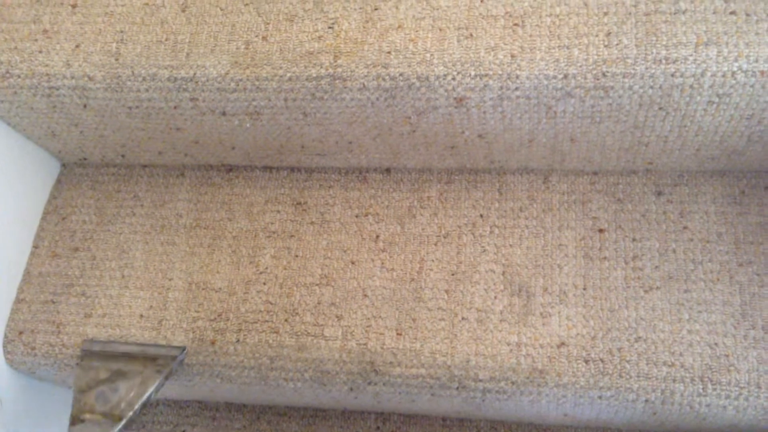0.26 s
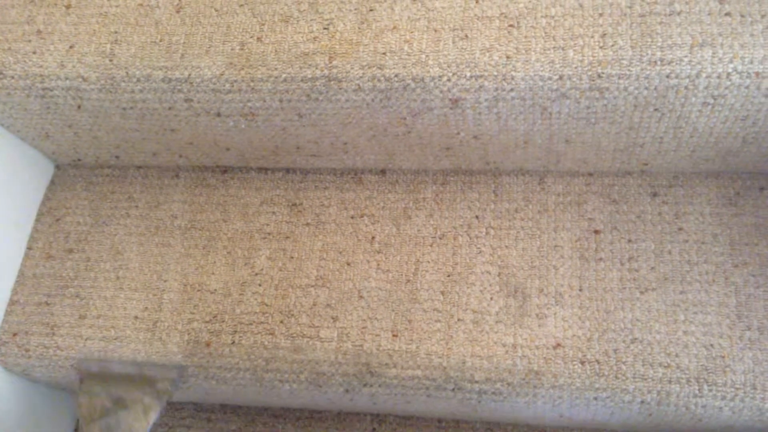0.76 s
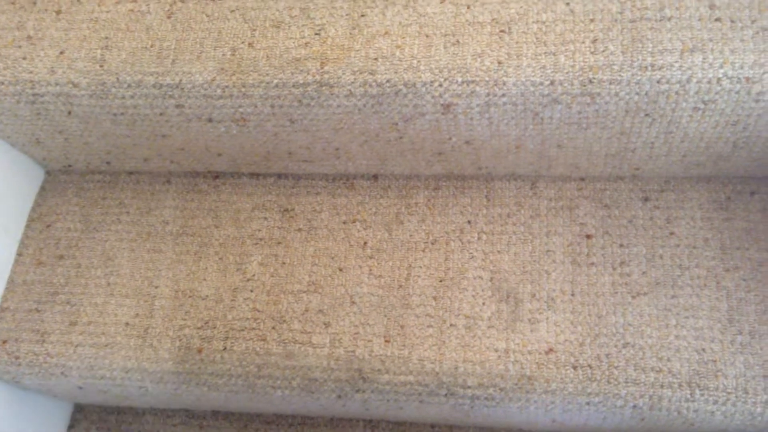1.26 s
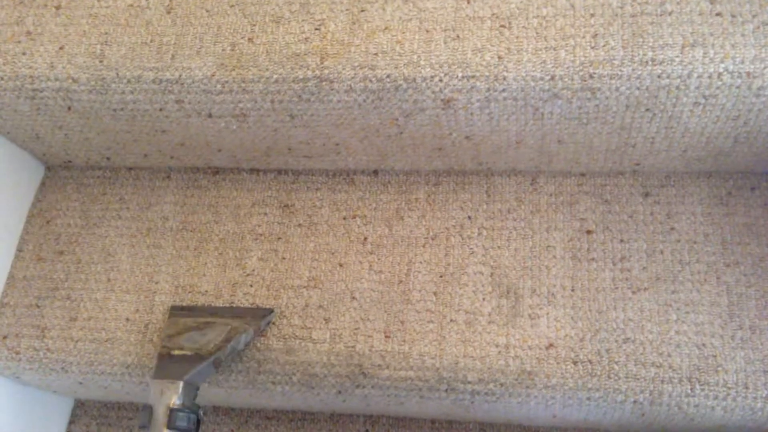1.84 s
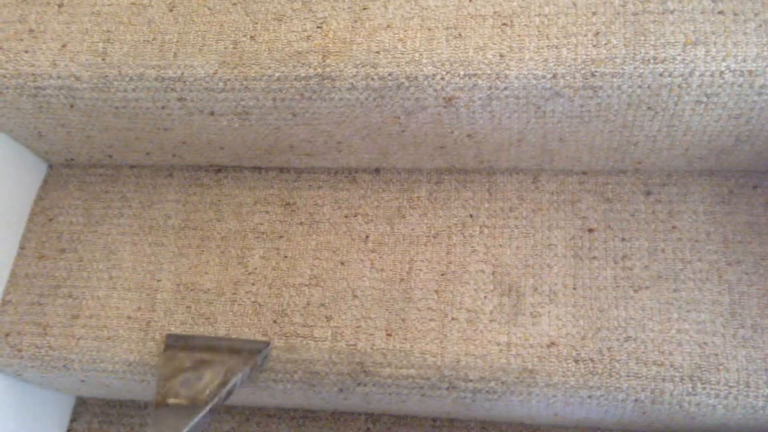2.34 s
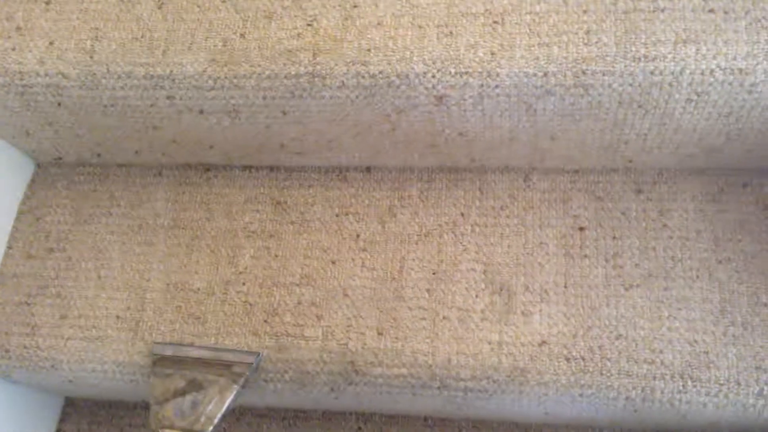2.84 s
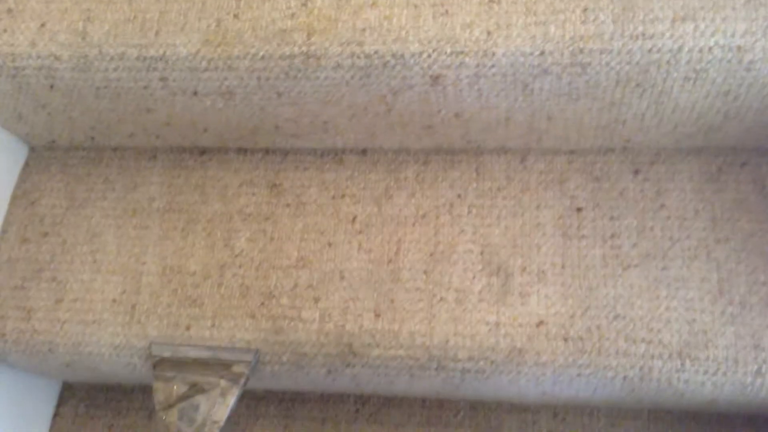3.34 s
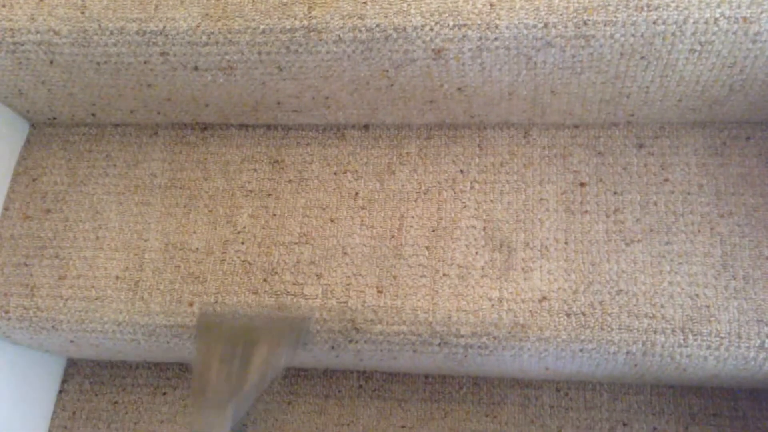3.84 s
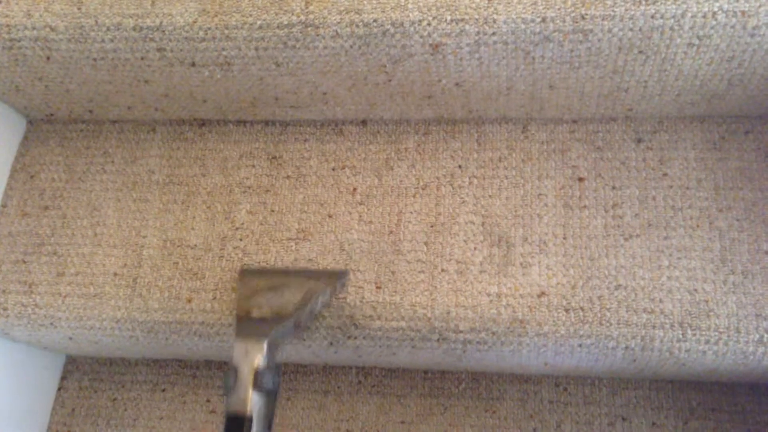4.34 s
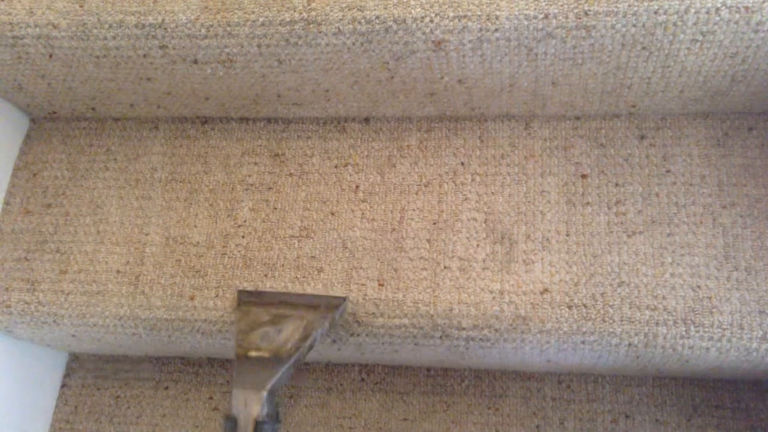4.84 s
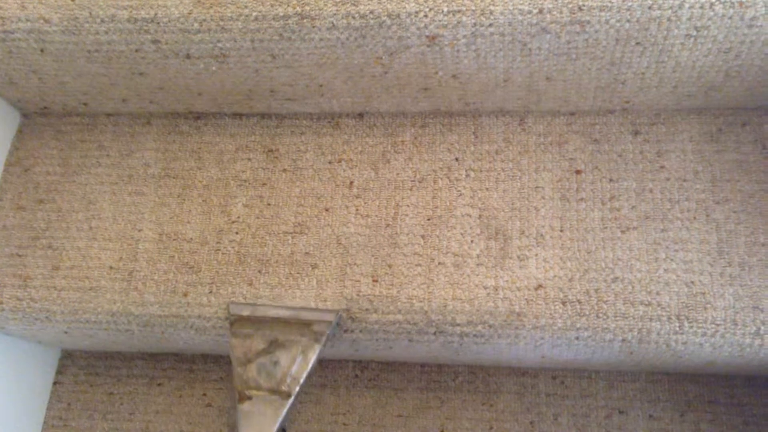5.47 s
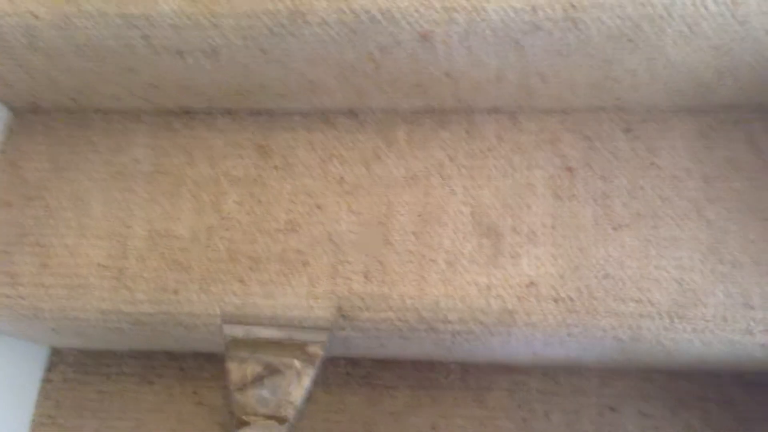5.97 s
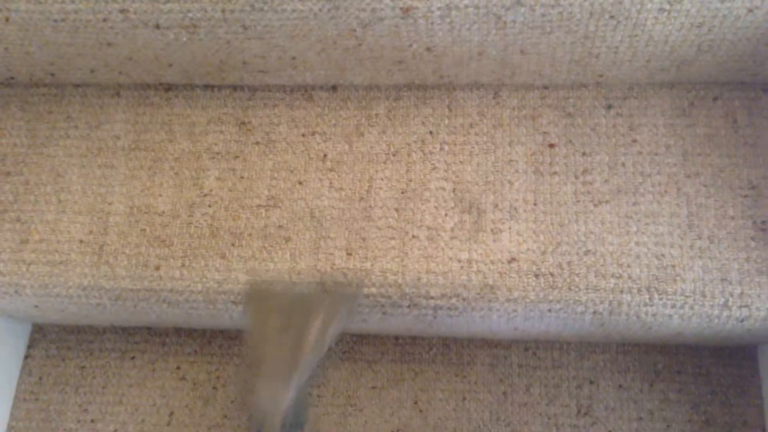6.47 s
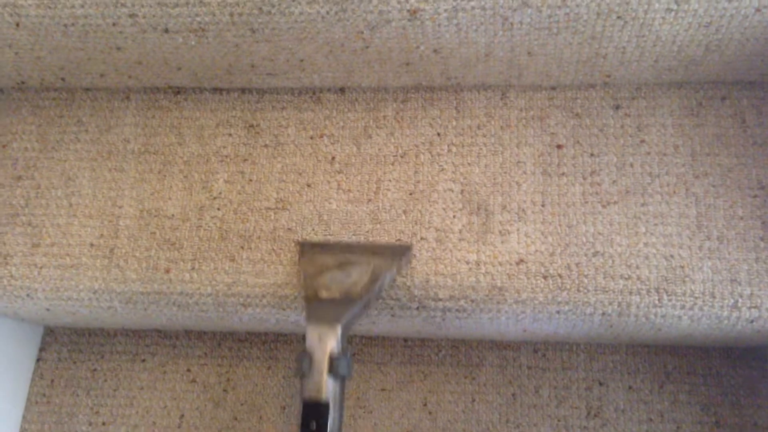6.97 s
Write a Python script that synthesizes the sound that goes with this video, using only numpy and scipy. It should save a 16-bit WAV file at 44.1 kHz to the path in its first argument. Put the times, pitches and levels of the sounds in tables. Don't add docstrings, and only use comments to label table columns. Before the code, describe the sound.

Close to carpeted stairs indoors, a cleaning machine drones with a low, slowly beating pump hum and a fan whine. Its hand tool hisses and sucks along wet pile, slurps loudly at the step's edge, lets go with a gulp and hose flutter, then thuds softly onto the tread for another stroke. Three such cycles pass, and a fourth stroke begins. Close microphone, short hallway tail.

```python
import sys
import numpy as np
from scipy import signal
from scipy.fft import rfft, irfft, next_fast_len
from scipy.io import wavfile
from scipy.ndimage import uniform_filter1d, map_coordinates

SR = 44100
rng = np.random.default_rng(int(sys.argv[2]) if len(sys.argv) > 2 else 0)


def linear_from_db(decibels):
    return 10 ** (np.asarray(decibels, float) / 20)


def inscribe(sig):
    pcm = np.round(np.clip(np.atleast_2d(sig).T, -1, 1) * 32767)
    wavfile.write(sys.argv[1], SR, pcm.astype(np.int16))


N = 318402
FRAME = 1024
TICKS = np.arange(N // 32 + 2) * 32 / SR

# time [s], riser echo delay [ms], slot resonance [Hz].
STROKE = [(0, 1.15, 3450), (.8, 1.06, 3700), (.85, 1.3, 3850), (1.1, 1.27, 3900), (1.75, 1.36, 3600),
          (2.3, 1.24, 4050), (3.0, 1.17, 4180), (3.55, 1.18, 4250), (4.25, 1.4, 2900), (4.75, 1.25, 3200),
          (5.55, 1.19, 3480), (5.68, 1.18, 4200), (6.15, 1.15, 4300), (6.8, 1.42, 2800), (7.22, 1.34, 2980)]
# start [s], time to seal [s], spray hiss [dB],
# slot jet [dB], jet drift [dB per s].
LANDINGS = [
    (-.5, .25, -37, -33, 0),
    (1.61, 0.39, -37.5, -34, -0.5),
    (4.12, 0.23, -37, -33.5, -0.46),
    (6.73, 0.2, -37, -32.5, -.5),
]
# peak [s], slurp [dB], jet [dB], rise [dB per s],
# gap resonance [Hz].
EDGES = [
    (.757, -23.5, -26, 126, 1450),
    (2.94, -32, -34, 226, 1220),
    (3.039, -16, -23, 97, 1198),
    (5.87, -32.5, -37, 58, 1360),
]
# peak [s], slurp [dB], fall [dB per s],
# gap resonance [Hz], upper resonance [dB].
LIFTS = [
    (1.075, -30.5, 120, 1525, 6),
    (3.578, -27.5, 198, 1390, 3),
    (6.17, -28.5, 85, 1320, 10),
]
# peak [s], level [dB].
GASPS = [
    (1.612, -37),
    (4.119, -32.5),
    (4.168, -33.5),
    (6.738, -30.5),
]

GASP_DB_PER_S = 602
EDGE_FALL_DB_PER_S, GULP_RISE_OVER_FALL = 444, 1.2


def unit(x):
    return x / np.sqrt(np.mean(x ** 2) + 1e-20)


def along(points, hz):
    f, v = np.transpose(points)
    return np.interp(np.log(hz + 1), np.log(f + 1), v, left=-120, right=-120)


def curves(rows):
    s, *cols = np.transpose(rows)
    return [np.interp(np.arange(N) / SR, s, c) for c in cols]


def per_sample(control):
    return np.interp(np.arange(N) / SR, TICKS, control)


def wobble(rate):
    knots = rng.standard_normal(int(N * rate / SR) + 4)
    return map_coordinates(knots, [np.arange(N) * rate / SR])


def filtered(x, response):
    m = next_fast_len(N + SR // 2)
    return irfft(rfft(x, m) * response(np.fft.rfftfreq(m, 1 / SR)), m)[:N]


def smoothed_field(shape, bins, frames):
    across = uniform_filter1d(rng.standard_normal(shape), size=bins, axis=0)
    return unit(uniform_filter1d(across, size=frames, axis=1))


def peak(hz, centre_hz, width_hz):
    return 1 / (1 + ((hz - centre_hz) / width_hz) ** 2)


def air(spectrum, patchy_db, lift_db=lambda hz, at: 0):
    overlap = FRAME - FRAME // 4
    hz, s, z = signal.stft(rng.standard_normal(N), SR, nperseg=FRAME, noverlap=overlap)
    at = np.minimum((s * SR).astype(int), N - 1)
    gain_db = patchy_db * smoothed_field(z.shape, 5, 40) + lift_db(hz[:, None], at)
    rough = signal.istft(z * linear_from_db(gain_db), SR, nperseg=FRAME, noverlap=overlap)[1][:N]
    return unit(filtered(rough, lambda f: linear_from_db(along(spectrum, f))))


def swell(s, db, rise, fall):
    s, db, rise, fall = (np.reshape(v, (-1, 1)) for v in (s, db, rise, fall))
    return db - np.where(TICKS < s, rise * (s - TICKS), fall * (TICKS - s))


def summed_db(*rows_db):
    return per_sample(10 * np.log10(np.sum(linear_from_db(2 * np.vstack(rows_db)), axis=0)))


def pump():
    # multiple of the shaft speed, level [dB rms].
    shaft_orders = [(2, -78), (3, -56.5), (4, -41.5), (5, -51.5), (6, -46), (8, -63.5), (17, -60),
                    (23, -66.5), (24, -64), (43, -63.5)]
    shaft_hz, hum_hz, in_step_s = 24.7135, 99.853, .301
    t = np.arange(N) / SR - in_step_s
    out = linear_from_db(-34.5) * np.sin(2 * np.pi * hum_hz * t)
    for order, db in shaft_orders:
        lead = rng.uniform(0, 2 * np.pi) * (order != 4)
        out += linear_from_db(db + 0.74 * wobble(2.65)) * np.sin(2 * np.pi * order * shaft_hz * t + lead)
    return np.sqrt(2) * out


def fan():
    # time [s], shaft speed [Hz].
    speed = [(0, 354), (.42, 361), (.6, 364.7), (.9, 366.3), (1.5, 358), (1.85, 352.3), (2.8, 366),
             (3.5, 365), (3.9, 360.7), (4.38, 352.5), (4.8, 357), (5.15, 364.3), (5.4, 367.2),
             (5.95, 370.3), (6.2, 369), (6.6, 358.7), (6.95, 352.4), (7.22, 354)]
    standing_hz = [350, 356.5, 361, 365.7, 368.2, 372]
    standing_db = [-56.5, -48, -53, -59.5, -46.5, -42]
    # centre [Hz], width [Hz], level [dB rms].
    casing_modes = [(46, 3, -56), (200, 14, -53), (277, 14, -58), (885, 14, -56), (922, 18, -57),
                    (987, 20, -52.5), (1027, 18, -53), (1070, 24, -51)]
    # frequency [Hz], density [dB per Hz].
    roar = [(13, -54), (22, -22), (43, -2.5), (97, 3.5), (162, -11), (200, -41), (311, -14), (365, -10.5),
            (511, -17.5), (1020, -10), (1150, -26), (1500, -8), (1950, -58), (3300, -120)]
    # frequency [Hz], density [dB per Hz].
    drone = [(650, -2), (1100, -29), (1750, 1.5), (2210, 7), (2990, -2), (4450, -1.5), (12600, -21.5),
             (15600, -33)]

    def casing(f):
        return sum(linear_from_db(db) / np.sqrt(w) * 1j * f * w / (c * c - f * f + 1j * f * w)
                   for c, w, db in casing_modes)

    shaft_hz, = curves(speed)
    level_db = np.interp(shaft_hz, standing_hz, standing_db) + 0.57 * wobble(9.6)
    whine = np.sqrt(2) * linear_from_db(level_db) * np.sin(2 * np.pi * np.cumsum(shaft_hz) / SR)
    rush = linear_from_db(-44.5) * air(roar, patchy_db=2.0) + linear_from_db(-41.5) * air(drone, patchy_db=2.0)
    return whine + rush + linear_from_db(41.5) * filtered(rng.standard_normal(N), casing)


def thuds():
    # time [s], blow [dB], contact
    # [ms], puff [dB].
    bumps = [
        (1.6079, -15, 1.73, -36),
        (1.624, -30, 1.5, -38),
        (4.112, -29, 0.82, -35),
        (4.12, -9, 1.52, -31),
        (4.165, -24, 1.6, -40),
        (6.705, -27, .9, -36),
        (6.738, -14.5, 1.64, -26),
        (1.068, -27, 1.4, -50),
        (1.142, -29, 1.6, -50),
        (3.594, -24, 1.5, -40),
    ]
    # frequency [Hz], level [dB], decay by 60 dB [s].
    tread = [(61, -15.5, 0.17), (96, -10.5, 0.092), (135, -9, 0.087), (199, -15, 0.23), (277, -10.5, 0.11),
             (383, -18.5, 0.12), (520, -16.5, 0.058), (640, -19, 0.047), (720, -14, .05)]
    lead_s = .01
    out, t = np.zeros(N + SR), np.arange(SR // 3) / SR
    late = np.maximum(t - lead_s, 0)
    for s, db, contact_ms, puff_db in bumps:
        u = (t - lead_s) * 1000 / contact_ms
        push = (u * u - 1) * np.exp(-u * u / 2)
        ring = sum(linear_from_db(g + 0.66 * rng.standard_normal() - 60 * late / t60) * np.sin(2 * np.pi * hz * late)
                   for hz, g, t60 in tread)
        blow = push + ring * (1 - np.exp(-late / 0.0023))
        puff = np.diff(rng.standard_normal(len(t) + 1)) * np.exp(-((t - .011) / .004) ** 2)
        puff = signal.lfilter([.3], [1, -1.1, .35], puff)
        out[round((s - lead_s) * SR):][:len(t)] += linear_from_db(db) * blow + linear_from_db(puff_db) * puff
    return out[:N]


def seal():
    touch_s, touch_share = 0.032, 0.38
    peel_s, part_s, part_share = 0.053, 0.062, 0.16
    drain_s = 0.55
    press = [(s + d, v) for s, grip_s, *_ in LANDINGS
             for d, v in ((0, 0), (touch_s, touch_share), (grip_s, 1))]
    peel = [(s + d, v) for s, *_ in LIFTS
            for d, v in ((-peel_s, 1), (part_s, part_share), (drain_s, 0))]
    return np.clip(np.interp(TICKS, *np.transpose(sorted(press + peel))), 0, 1)


def stroke_clock():
    land_s = np.transpose(LANDINGS)[0]
    stroke = np.searchsorted(land_s, TICKS, side="right") - 1
    return stroke, TICKS - land_s[stroke]


def flow():
    open_hiss_db, open_jet_db = -53, -53
    wetting_db_per_s, wet_after_s = 2.5, 1.22
    pinch_db, pinch_s = 0.5, 0.3
    edge_hiss_db, gulp_jet_db, gasp_jet_db = -9, -6.5, -2.5
    _, _, hiss_db, jet_db, drift = np.transpose(LANDINGS)
    edge_s, _, surge_db, rise, _ = np.transpose(EDGES)
    lift_s, lift_db, fall = np.transpose(LIFTS)[:3]
    (stroke, since), grip = stroke_clock(), seal()
    past = TICKS - edge_s[[0, 2, 3], None]
    pinch = pinch_db * np.sum((past > 0) * np.exp(-np.abs(past) / pinch_s), axis=0)
    hiss = hiss_db[stroke] + wetting_db_per_s * np.minimum(since, wet_after_s) - pinch
    jet = jet_db[stroke] + drift[stroke] * since - pinch
    surge = swell(edge_s, surge_db, 0.51 * rise, EDGE_FALL_DB_PER_S)
    gulp = swell(lift_s, lift_db, GULP_RISE_OVER_FALL * fall, EDGE_FALL_DB_PER_S) + gulp_jet_db
    gasp = swell(*np.transpose(GASPS), GASP_DB_PER_S, GASP_DB_PER_S) + gasp_jet_db
    return (summed_db(open_hiss_db + grip * (hiss - open_hiss_db), surge + edge_hiss_db),
            summed_db(open_jet_db + grip ** 0.71 * (jet - open_jet_db), surge, gulp, gasp))


def ringing():
    slot_db, fill_s = 4, .6
    return per_sample(slot_db * seal() * np.minimum(stroke_clock()[1] / fill_s, 1))


def nozzle():
    # frequency [Hz], density [dB per Hz].
    spray = [(3000, -21), (5000, -1), (7000, -1.5), (9500, -4), (12500, -7.5), (15500, -10), (16500, -42)]
    # frequency [Hz], density [dB per Hz].
    slot_air = [(1200, -12.5), (2200, -9.5), (3200, 5), (4500, 3), (6000, -0.5), (8000, -9), (12000, -20)]
    hiss_db, jet_db = flow()
    slot_hz, slot_db = curves(STROKE)[1], ringing()
    flicker = 0.18 * wobble(25) + .5 * wobble(60)
    hiss = linear_from_db(hiss_db + flicker + 0.42 * wobble(11)) * air(spray, patchy_db=1.2)

    def slot(hz, at):
        return slot_db[at] * peak(hz, slot_hz[at], width_hz=110)

    return hiss + linear_from_db(jet_db + 2.0 * flicker) * air(slot_air, 1.0, slot)


def leaks():
    # peak [s], level [dB].
    flaps = [
        (1.065, -31),
        (1.14, -31),
        (1.23, -34),
        (3.6, -28),
        (3.69, -31.5),
        (6.2, -34),
        (6.3, -34),
        (6.38, -38),
        (6.62, -43),
    ]
    open_leak_db, sealed_leak_db = -46, -44.5
    open_hose_db, sealed_hose_db = -39, -52
    crest_db = 1.5
    edge_upper_db, edge_hose_db = 12, -12
    edge_s, edge_db, _, rise, edge_hz = np.transpose(EDGES)
    lift_s, lift_db, fall, lift_hz, lift_upper_db = np.transpose(LIFTS)
    grip = seal()
    edge = swell(edge_s, edge_db + crest_db, rise, EDGE_FALL_DB_PER_S)
    edge = np.minimum(edge, edge_db[:, None])
    gulp = swell(lift_s, lift_db + crest_db, GULP_RISE_OVER_FALL * fall, fall)
    gulp = np.minimum(gulp, lift_db[:, None])
    reseal = swell([s + d for s, d, *_ in LANDINGS[1:]], db=-39.5, rise=134, fall=15)
    gasp = swell(*np.transpose(GASPS), GASP_DB_PER_S, GASP_DB_PER_S)
    flap = swell(*np.transpose(flaps), rise=250, fall=130)
    widest = np.argmax(np.vstack([edge, gulp]), axis=0)
    slurp_db = summed_db(open_leak_db + grip * (sealed_leak_db - open_leak_db), edge, gulp, reseal, gasp)
    hose_db = summed_db(open_hose_db + grip * (sealed_hose_db - open_hose_db), edge + edge_hose_db, flap)
    mouth_hz = np.r_[edge_hz, lift_hz]
    upper_db = np.r_[np.full(len(EDGES), edge_upper_db), lift_upper_db]
    return slurp_db, hose_db, per_sample(mouth_hz[widest]), per_sample(upper_db[widest])


def lip():
    # frequency [Hz], density [dB per Hz].
    wet_burst = [(350, -26), (600, -10), (900, -8), (1100, -5.5), (1500, -4), (1900, -2.5), (2250, -6),
                 (2900, -8), (4500, -12.5)]
    # frequency [Hz], density [dB per Hz].
    hose_flutter = [(50, -30), (120, -5), (200, 1), (300, -1), (420, -4), (520, -13), (700, -16),
                    (950, -22), (1400, -40)]
    slurp_db, flutter_db, mouth_hz, upper_db = leaks()
    leak = np.clip((slurp_db + 42) / 12, 0, 1)

    def gap(hz, at):
        low = 11 * peak(hz, mouth_hz[at], 90)
        high = upper_db[at] * peak(hz, 1.746 * mouth_hz[at], 120)
        return leak[at] * (low + high - 6)

    spit = wobble(70)
    slurp = unit(linear_from_db(1.3 * spit) * air(wet_burst, 1.13, gap))
    flutter = unit(linear_from_db(1.5 * spit + 1.75 * wobble(30)) * air(hose_flutter, patchy_db=2.5))
    return linear_from_db(slurp_db) * slurp + linear_from_db(flutter_db - 3.5) * flutter


def stairs(x):
    # delay as a multiple of the riser's, level [dB].
    surfaces = [(1, -13), (.61, -15), (1.73, -18)]
    delay = curves(STROKE)[0] * SR / 1000
    now = np.arange(N)
    dull = filtered(x, lambda hz: 1 / (1 + (hz / 5500) ** 2))
    return x + sum(linear_from_db(db) * np.interp(now - share * delay, now, dull) for share, db in surfaces)


def hallway(x):
    t = np.arange(SR // 3) / SR
    bright = rng.standard_normal(len(t))
    dull = signal.lfilter([.3], [1, -.7], rng.standard_normal(len(t)))
    tail = bright * linear_from_db(-60 * t / 0.079) + 1.27 * dull * linear_from_db(-60 * t / 0.1)
    tail *= t > .003
    return signal.fftconvolve(x, tail / np.linalg.norm(tail))[:N]


def scene():
    airflow = linear_from_db(-0.39) * stairs(nozzle() + lip())
    tail = linear_from_db(-13) * hallway(airflow)
    return np.tile(pump() + fan() + airflow + tail + thuds(), (2, 1))


def patchy_treble(x):
    top_hz = 15320
    hz, _, z = signal.stft(x, SR, nperseg=FRAME)
    strips = smoothed_field(z.shape, 3, 3)
    spells = map_coordinates(rng.standard_normal(24), [np.linspace(0, 23, z.shape[1])])
    limit = np.interp(hz, [9000, 12500, 15500], [4, 2.5, 2.1])[:, None] - .4 * spells
    kept = np.where(strips > limit, .08, 1) * (hz < top_hz + 200)[:, None]
    thinned = signal.istft(z * kept, SR, nperseg=FRAME)[1][:N]
    return filtered(thinned, lambda f: f < top_hz)


def split_noise():
    # centre [s], low edge [Hz], high edge [Hz], level [dB].
    bursts = [(.6638, 7500, 9010, -46), (1.4067, 4170, 5210, -53.5), (2.4524, 6830, 8320, -44.5),
              (2.8, 4130, 5760, -39.5), (2.9853, 11680, 13150, -49), (3.3833, 5110, 6930, -39),
              (3.9386, 6210, 7640, -60), (4.5179, 4140, 5240, -42), (4.5179, 9600, 11000, -49),
              (4.7772, 5640, 8310, -41), (5.7993, 4560, 5760, -42.5), (6.6778, 5630, 7580, -55)]
    apart, hz = np.zeros(N), np.fft.rfftfreq(2 * FRAME, 1 / SR)
    for s, low_hz, high_hz, db in bursts:
        noise = irfft(rfft(rng.standard_normal(2 * FRAME)) * (hz > low_hz) * (hz < high_hz))
        burst = linear_from_db(db) * unit(noise) * signal.windows.cosine(2 * FRAME)
        apart[round(s * SR) - FRAME:][:2 * FRAME] += burst
    return apart


def top_cut(x):
    return signal.sosfilt(signal.butter(12, 15960, fs=SR, output="sos"), x)


def record(dry):
    mid, apart = patchy_treble(dry[0]), split_noise()
    return top_cut(np.array([mid + apart, mid - apart]))


dry = scene()
out = record(dry)
inscribe(out)
```